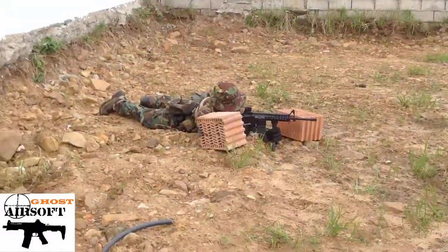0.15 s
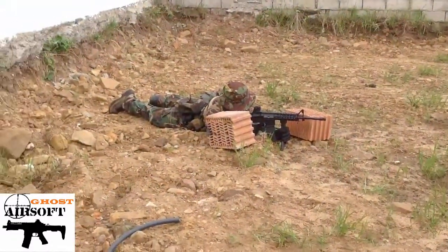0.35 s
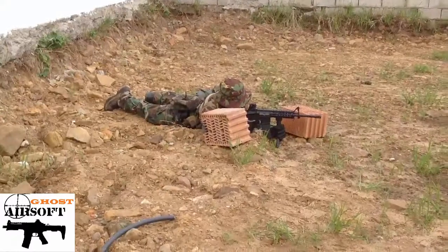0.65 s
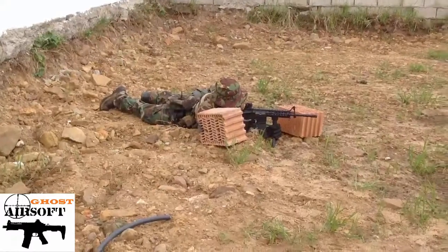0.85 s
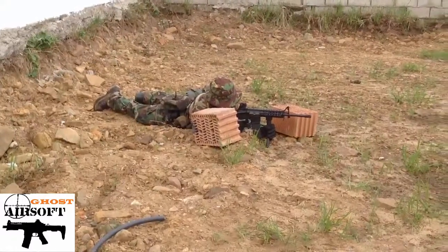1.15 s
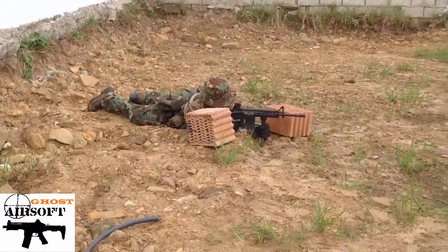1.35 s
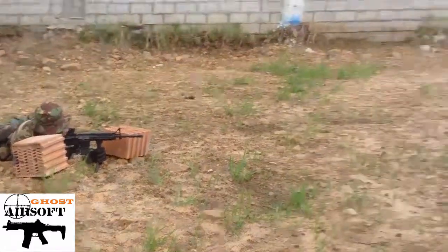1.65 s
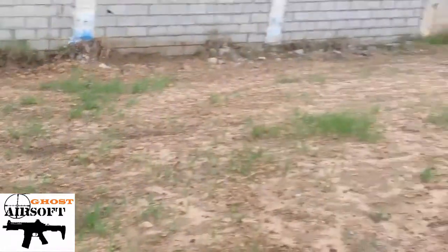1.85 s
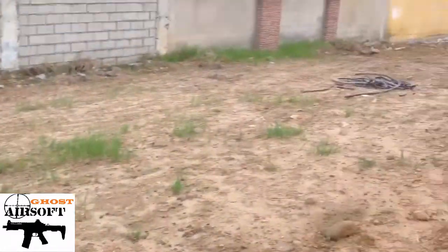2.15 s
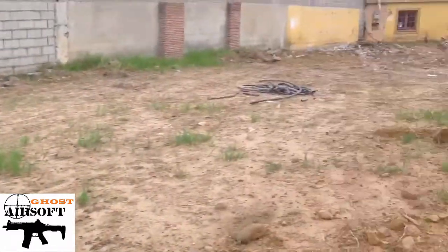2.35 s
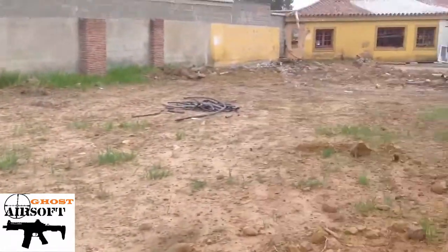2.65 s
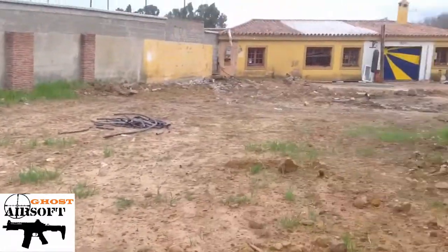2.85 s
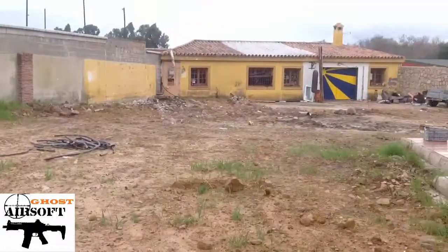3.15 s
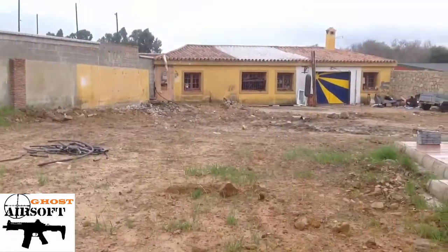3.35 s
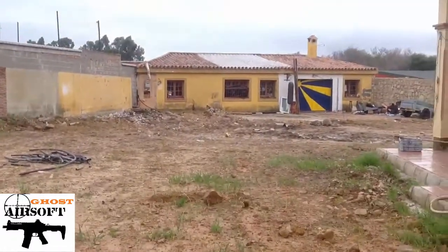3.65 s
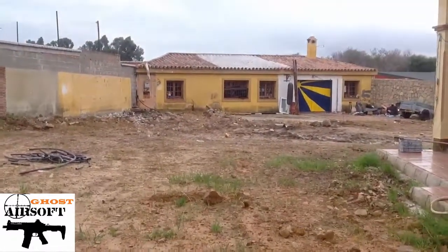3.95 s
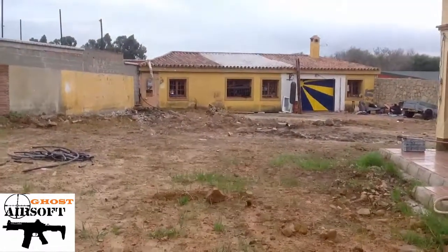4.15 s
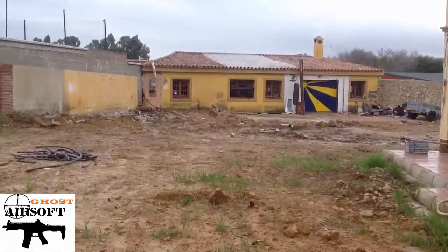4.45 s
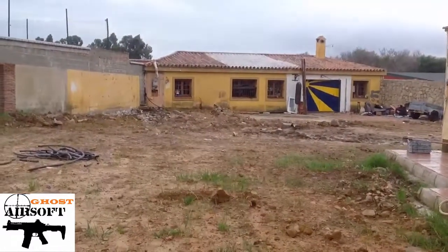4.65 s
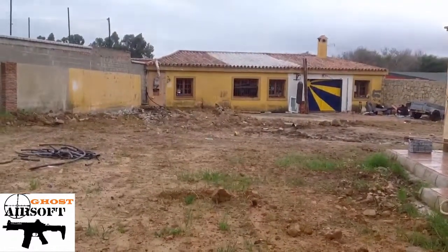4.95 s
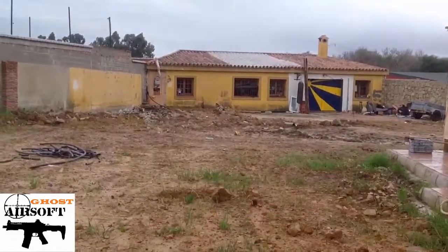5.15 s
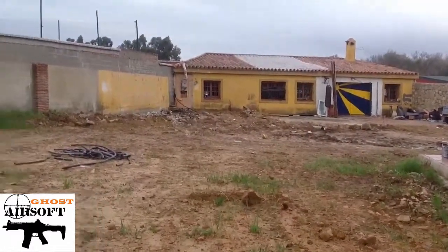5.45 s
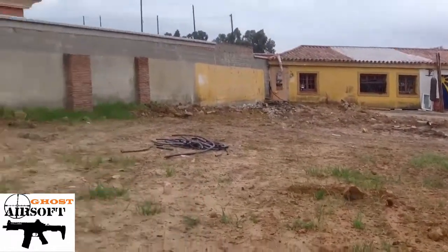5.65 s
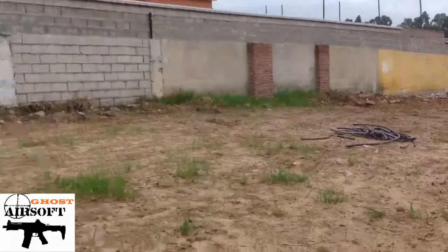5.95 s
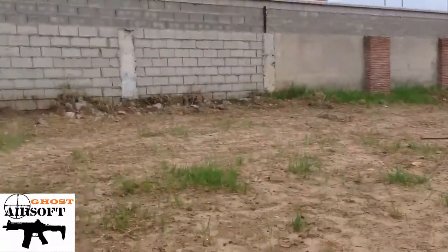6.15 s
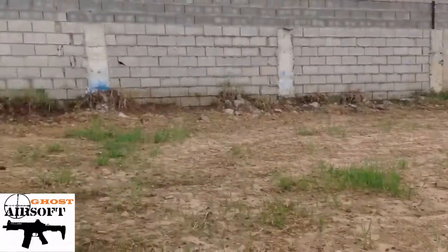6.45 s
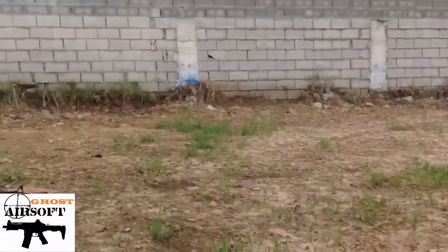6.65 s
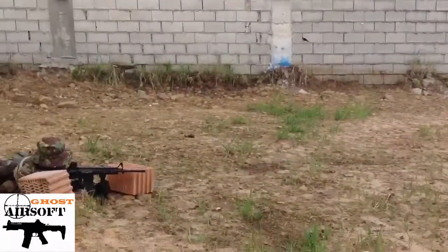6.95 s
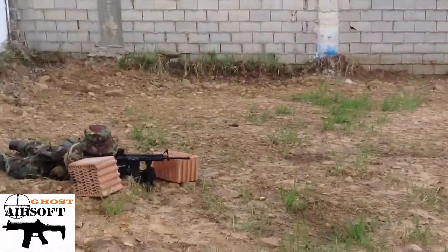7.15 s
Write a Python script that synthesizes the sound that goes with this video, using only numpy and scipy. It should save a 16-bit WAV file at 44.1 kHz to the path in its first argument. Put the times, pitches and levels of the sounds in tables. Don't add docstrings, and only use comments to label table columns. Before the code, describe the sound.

Faint outdoor hum and a little grit, then a geared motor spins up and a toy gun snaps off four rapid pops. A short metallic ratcheting rattle follows, then seven shots, more winding, eight shots, a brief pause and six shots. Crunching steps and bright stone clicks lead to a final four-shot burst and more grit. The single camera microphone clips slightly; the walled yard answers with sharp slaps and a fading wash.

```python
import sys
import numpy as np
from scipy import signal
from scipy.fft import rfft, irfft, next_fast_len
from scipy.io import wavfile
from scipy.ndimage import uniform_filter1d

SR = 44100
rng = np.random.default_rng(int(sys.argv[2]) if len(sys.argv) > 2 else 0)


def gain_from_db(level_db):
    decades = np.asarray(level_db, float) / 20
    return 10 ** decades


def generate_wav(signal):
    frames = np.transpose(np.atleast_2d(signal))
    scaled = np.clip(frames, -1, 1) * 32767
    pcm = np.round(scaled).astype(np.int16)
    wavfile.write(sys.argv[1], SR, pcm)


N = 321489

# pitch_hz, level_db (per Hz)
AIR_COLOUR = [(15, -40), (25, -28.5), (119, -8), (331, -0.5), (368, -3), (457, -7), (537, -7.5),
              (1340, -10), (1710, -15.5), (13200, -27.5), (15500, -29)]
AIR_DB = -55.5

# peak_s, level_db, rise_s and fall_s (time to change by 20 dB)
CRUNCHES = [(.01, -65.5, 0.86, 0.12), (.216, -67, 0.4, -0.04), (.304, -70, -0.05, -0.07),
            (.366, -62, -0.04, .012), (4.18, -54.5, 0.44, 0.21), (4.285, -51.5, 0.09, 0.21),
            (5.14, -45, 0.3354, .1), (5.33, -60, 0.17, .25), (5.384, -45, .012, .018),
            (5.597, -38, .001, .06), (5.632, -36.5, .022, 0.03), (5.7, -61, .03, .25),
            (5.93, -61.5, 0.02, .3), (5.978, -52, 0.0275, 0.08), (6.924, -45.5, 0.0436, -0.0176),
            (7.003, -55, 0.08, 0.27), (7.12, -57.5, 0.27, 0.3)]
# start_s, level_db, pitch_hz
STONES = [(2.937, -40.5, 7000), (2.9622, -29, 11800), (4.1984, -38, 4110), (4.2747, -38, 5980),
          (4.29, -38, 6080), (4.3024, -39.5, 6900), (5.1392, -34, 12900), (5.3827, -38, 3860),
          (5.5964, -24, 9920), (5.6044, -31.5, 8330), (5.6211, -21, 12900), (5.6326, -23, 12700),
          (5.9738, -43.5, 4120), (6.0437, -42.5, 6750), (6.904, -38.5, 12700), (6.9212, -22.5, 12900),
          (6.986, -41.5, 14300), (6.9924, -42, 7120), (7.003, -30.5, 11500), (7.0084, -38.5, 7010),
          (7.0329, -31.5, 13200), (7.0497, -33.5, 6690), (7.0694, -40.5, 6110), (7.0777, -40, 6450),
          (7.0903, -40, 3020), (7.1014, -36.5, 5070)]
# start_s, level_db, pitch_hz
HEEL_KNOCKS = [
    (5.624, -37.5, 1193),
    (5.636, -43, 600),
]
DULL_DB, DULL_SLOPE = -28, 0.5484

# start_s, level_db, hold_s, fall_s (time to fall 20 dB)
WINDER_TURNS = [
    (2.007, -29, 0.096, 0.13),
    (3.045, -29, 0.0801, 0.0935),
    (3.236, -37.5, 0.0484, 0.02),
    (3.297, -28, 0.0418, 0.15),
]
# start_s, level_db, pitch_hz
PAWL_CLICKS = [(2.0071, -23, 9070), (2.0248, -21, 8970), (2.0662, -28.5, 9140), (3.046, -15.5, 10900),
               (3.0644, -16.5, 12700), (3.2365, -21.5, 8600), (3.2528, -26.5, 6370), (3.2982, -15.5, 10800),
               (3.3153, -21.5, 6370)]
# pitch_hz, level_db, t60_s (time to fade 60 dB)
DRUM_MODES = [(3805, -2.5, 0.043), (6170, 0, 0.048), (9060, 1, 0.044), (10100, -5.5, 0.032),
              (12600, 2.5, 0.041)]
# pitch_hz, level_db (per Hz)
PELLET_COLOUR = [(59, -69), (100, -38), (275, -1), (1230, -12), (1370, -5.5), (3610, -2), (4560, -3),
                 (12800, -1), (15500, -5.5)]

# first_slam_s, shots_count, first_cycle_slower_ms, last_cycle_coasts_ms
BURSTS = [
    (1.194, 4, 5.7, -1.1),
    (2.1616, 7, 7.8, 2.9),
    (3.4429, 8, 5.4, -.7),
    (4.52, 6, 13.8, .5),
    (6.2074, 4, 8.7, 3.9),
]
# pull_s, spin_up_s, motor_db, treble_toward_microphone_db
TRIGGER_PULLS = [(1.108, 0.047, -27, -2), (2.086, 0.0478, -27, 1.5), (3.355, 0.05, -26.5, -1),
                 (4.46, .066, -27, -0.66), (6.123, 0.0547, -27.5, -0.5)]
# nearest_wall_later_ms, nearest_wall_db, end_wall_db
CAMERA_TURNS = [(-.54, -0.93, -2), (.1, 0.5, 2.5), (.28, -1.5, 5.5), (.3, 0.18, 5.5), (-.18, -1.13, 0.5)]
CYCLE_MS, SETTLE = 58.1, .23
# pitch_hz, level_db (per Hz)
GEAR_COLOUR = [(59, -51), (100, -20), (293, -9.5), (1840, -10), (2580, -9), (3180, -1), (3690, -3),
               (4280, -4), (5870, -5), (12800, -8.5), (15500, -8)]
WHINE_HZ, SAG = 3500, .15
ENGAGE_S, DRAW_S = 0.02595, .045
POP_DB = 1.1
# pitch_hz, level_db, t60_s
SHELL_MODES = [(4300, 3, 0.00457), (5100, -3, 0.0056), (6450, -1.5, 0.00323), (8480, -2, 0.0059),
               (1930, -18, 0.0049), (13900, -4.5, 0.0024)]
# pitch_hz, level_db, t60_s
STOCK_MODES = [(265, -28, 0.065), (447.8, -32.5, 0.0518), (151.2, -33, 0.0464), (672.5, -30, .045),
               (299.8, -31, 0.059)]
SLAM_LEAD = 270

# delay_ms, level_db, pitch_hz (centre), width_hz, scatter_ms
WALLS = [(9.204, -10.5, 4200, 4600, 0.05), (39.44, -14.5, 4950, 7200, 0.4), (45.07, -18, 7500, 8900, 2),
         (103.95, -15.5, 8000, 11000, .5), (147.2, -29.5, 5000, 6900, 1.5), (206.7, -29.5, 6800, 9100, 4.7),
         (250.5, -31, 2200, 5000, 1.5), (40, -24, 315, 150, .1), (105.13, -33, 327, 320, .1)]
END_WALL = 3
# pitch_hz, t60_s
YARD_FADE = [(150, 0.655), (500, 0.944), (2000, 0.839), (5000, 0.839), (9000, 0.767), (14000, 0.534)]
YARD_DB = -9


def level(x, db):
    return x * gain_from_db(db) / np.sqrt(np.mean(x ** 2))


def band(x, hz, width_hz):
    half = np.array([-.5, .5]) * width_hz
    edge = np.clip(np.sqrt(hz ** 2 + width_hz ** 2 / 4) + half, 20, SR * .45)
    return signal.sosfilt(signal.butter(2, edge, "bandpass", fs=SR, output="sos"), x)


def colour(x, table):
    hz, db = np.transpose(table)
    size = next_fast_len(len(x))
    f = np.fft.rfftfreq(size, 1 / SR) + 1
    gain = gain_from_db(np.interp(np.log(f), np.log(hz), db))
    return level(irfft(rfft(x, size) * gain, size)[:len(x)], 0)


def ring(modes, size, detune=0.):
    t = np.arange(size) / SR
    shift = 1 + detune * rng.standard_normal(len(modes))
    out = np.zeros(size)
    for (hz, db, t60), k in zip(modes, shift):
        out += gain_from_db(db) * np.sin(2 * np.pi * hz * k * t) * gain_from_db(-60 * t / t60)
    return out


def grains(size, rate, spread_db):
    chance = rng.random((3, size))
    hit = chance[0] < rate / SR
    sign = np.sign(chance[1] - .5)
    return hit * sign * gain_from_db(-spread_db * np.log(1 - .995 * chance[2]))


def walk(size, rate):
    k = int(SR / rate)
    steps = np.repeat(rng.standard_normal(size // k + 1), k)
    return 1.415 * uniform_filter1d(uniform_filter1d(steps, k), k)[:size]


def add(out, x, s):
    i = int(round(s * SR))
    out[i:i + len(x)] += x[:len(out) - i]


def swell(rows):
    out = np.zeros(N)
    for s, db, rise_s, hold_s, fall_s in rows:
        i = slice(max(int((s - 3 * rise_s) * SR), 0), int((s + hold_s + 3 * fall_s) * SR))
        t = np.arange(N)[i] / SR - s
        away = np.maximum(-t / rise_s, (t - hold_s) / fall_s)
        out[i] += gain_from_db(db - 20 * np.maximum(away, 0))
    return out


def ticks(table, width, decay_s, gain_db):
    out = np.zeros(N)
    t = np.arange(900) / SR
    for s, db, hz in table:
        tap = band(rng.standard_normal(len(t)) * np.exp(-t / decay_s), hz, hz * width)
        add(out, gain_from_db(db + gain_db) * tap / np.abs(tap).max(), s)
    return out


def air():
    gust = walk(N, 0.946)
    hum = [colour(rng.standard_normal(N), AIR_COLOUR) for _ in range(2)]
    bands = np.zeros(N)
    for k, hz in enumerate(31 * 2. ** np.arange(0, 9.5, .5)):
        flicker = gain_from_db(0.49 * gust + .9 * walk(N, 9))
        bands += band(hum[k % 2], hz, hz * 0.405) * flicker
    return level(bands, AIR_DB)


def feet():
    crunch = swell((s, db, rise_s, 0, fall_s) for s, db, rise_s, fall_s in CRUNCHES)
    bright = level(band(grains(N, 4000, 2.95), 8780, 12770), 0) * crunch
    dull = level(band(grains(N, 2500, 2.86), 1654, 3550), 0) * gain_from_db(DULL_DB) * crunch ** DULL_SLOPE
    stones = ticks(STONES, 0.75, 0.00124, 2.17)
    knocks = ticks(HEEL_KNOCKS, 0.365, 0.0063, 0)
    return bright + dull + stones + knocks


def winder():
    pellets = grains(N, 5000, 2.14)
    turning = swell((s, db, .001, hold_s, fall_s) for s, db, hold_s, fall_s in WINDER_TURNS)
    pawl = ticks(PAWL_CLICKS, 0.906, 0.00232, 2.96)
    taps = gain_from_db(-40) * level(pellets, 0) * turning + gain_from_db(-30.5) * pawl
    drum = signal.fftconvolve(taps, ring(DRUM_MODES, size=6000))[:N]
    rattle = gain_from_db(-1.5) * turning * colour(pellets, PELLET_COLOUR)
    return rattle + drum + pawl


def yard(near_ms, near_db, far_db):
    t = np.arange(int(.9 * SR)) / SR
    hz, t60 = np.transpose(YARD_FADE)
    tail = np.zeros(len(t))
    for f in 125 * 2. ** np.arange(8):
        fade = gain_from_db(-60 * t / np.interp(np.log(f), np.log(hz), t60))
        tail += band(rng.standard_normal(len(t)), f, f * 0.785) * fade
    out = gain_from_db(YARD_DB) * tail / np.sqrt(np.sum(tail ** 2)) * (1 - np.exp(-t / 0.0212))
    for k, (delay_ms, db, centre_hz, width_hz, scatter_ms) in enumerate(WALLS):
        slap = .3 * rng.standard_normal(900) * np.exp(-t[:900] * 1000 / scatter_ms)
        slap[0] = 1
        slap = band(slap, centre_hz, width_hz)
        if k == 0:
            delay_ms, db = delay_ms + near_ms, db + near_db
        if k == END_WALL:
            db = db + far_db
        add(out, gain_from_db(db) * slap / np.sqrt(np.sum(slap ** 2)), delay_ms / 1000)
    return out


def slams(first, count, lag_ms, coast_ms):
    cycle_ms = CYCLE_MS + lag_ms * SETTLE ** np.arange(count - 1)
    cycle_ms[-1] += coast_ms
    return first + np.append(0, np.cumsum(cycle_ms)) / 1000


def motor(t, shots, release, spin_s):
    ahead = np.append(shots, 9)[np.searchsorted(shots, t)] - t
    first_draw = (.35 + .65 * t / shots[0]) * (t > ENGAGE_S)
    draw = np.where(t < shots[0], first_draw, np.clip(1 - ahead / DRAW_S, 0, 1))
    load = uniform_filter1d(draw * (ahead > .006), size=150)
    speed = (1 - np.exp(-t / spin_s)) * np.exp(-np.maximum(t - release, 0) / 0.025)
    mesh_hz = WHINE_HZ * speed * (1 - SAG * load) * (1 + 0.01105 * walk(len(t), 300))
    phase = 2 * np.pi * np.cumsum(mesh_hz) / SR
    flutter = gain_from_db(3.62 * walk(len(t), 90))
    engaged = gain_from_db(14 * np.clip(load / 0.23, 0, 1) - 1.5 * np.exp(-t / 0.08))
    octave = gain_from_db(-11 + 21 * np.exp(-t / 0.12)) * np.sin(2 * phase)
    whine = flutter * engaged * (np.sin(phase) + octave)
    strain_db = (3.37 + 9 * np.exp(-t / 0.049)) * load
    clatter = colour(grains(len(t), 9000, 2.58), GEAR_COLOUR)
    teeth = clatter * gain_from_db(strain_db + 1.27 * walk(len(t), 149.12))
    return speed ** 0.95 * (teeth + gain_from_db(-19.5) * whine)


def slam(pop_db):
    t = (np.arange(2600) - SLAM_LEAD) / SR
    chance = rng.standard_normal(3)
    pop = -np.gradient(np.exp(-((t - 4e-5) / 4.5e-5) ** 2))
    pop = pop / pop.max() + gain_from_db(-25.5) * np.exp(-((t + 0.000298) / 0.000517) ** 2)
    pop = pop + gain_from_db(-15.5 + 1.5 * chance[0]) * np.roll(pop, shift=20)
    shell = np.roll(ring(SHELL_MODES, size=len(t), detune=0.0564), shift=SLAM_LEAD) * (t >= 0)
    shell = gain_from_db(-14.5 + 1.4 * chance[1]) * shell
    scrape = gain_from_db(-19) * np.exp(t / 0.00414)
    after = gain_from_db(-10.5) * np.exp(-t / 0.001586) + gain_from_db(-37) * np.exp(-t / 0.0087)
    rattle = np.where(t < 0, scrape, after) * colour(grains(len(t), 7000, 3.26), GEAR_COLOUR)
    thump = ring(STOCK_MODES, size=len(t), detune=0.0204)
    return gain_from_db(pop_db + 1.09 * chance[2]) * (pop + shell + rattle) + thump


def rifle():
    out = np.zeros(N)
    t = np.arange(int(.75 * SR)) / SR
    for burst, (pull, spin_s, motor_db, treble_db), turn in zip(BURSTS, TRIGGER_PULLS, CAMERA_TURNS):
        shots = slams(*burst)
        release = shots[-1] - burst[-1] / 1000 - pull
        gun = gain_from_db(motor_db) * motor(t, shots - pull, release, spin_s)
        for s in shots:
            add(gun, slam(POP_DB), s - pull - SLAM_LEAD / SR)
        direct = gun + (gain_from_db(treble_db) - 1) * band(gun, 11320, 9600)
        add(out, direct, pull)
        add(out, signal.fftconvolve(gun, yard(*turn)), pull)
    return out


def scene():
    return (air() + feet() + winder() + rifle())[None]


def roll_off(x):
    return signal.sosfilt(signal.butter(12, 16490, fs=SR, output="sos"), x)


def record(dry):
    x = signal.sosfilt(signal.butter(2, 110, "highpass", fs=SR, output="sos"), dry)
    x = signal.sosfilt(signal.ellip(8, .2, 45, 15300, fs=SR, output="sos"), x)
    return roll_off(np.clip(x, -1, 1))


dry = scene()
out = record(dry)
generate_wav(out)
```